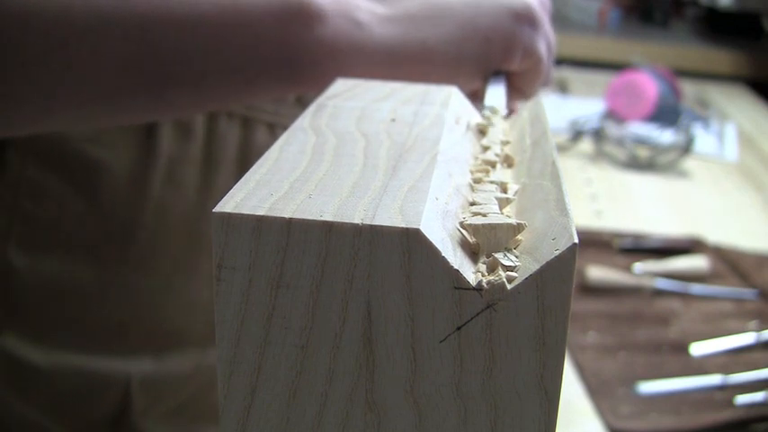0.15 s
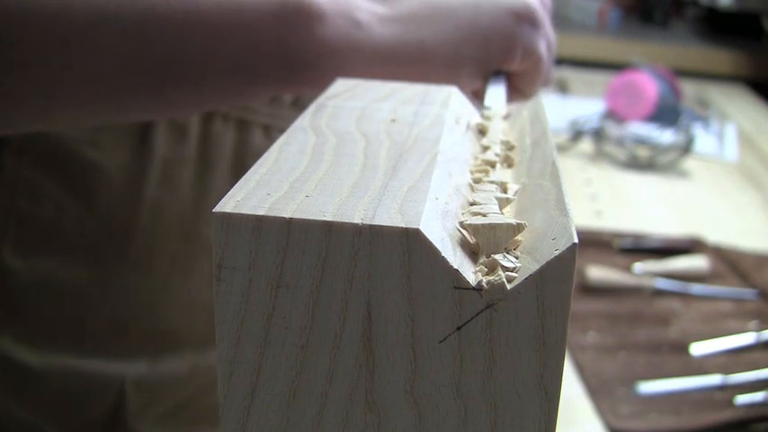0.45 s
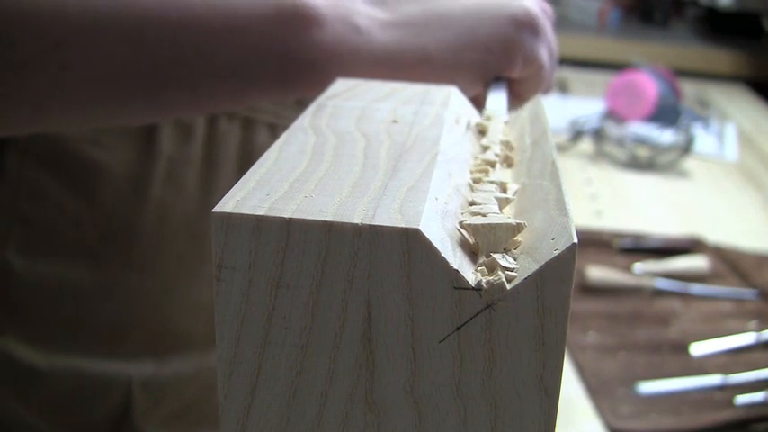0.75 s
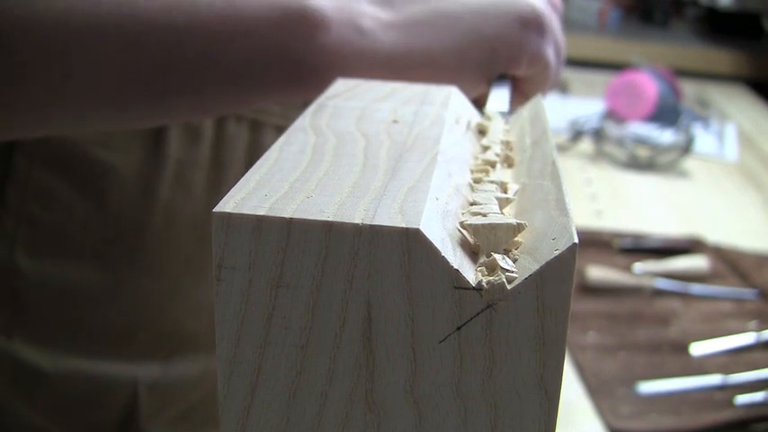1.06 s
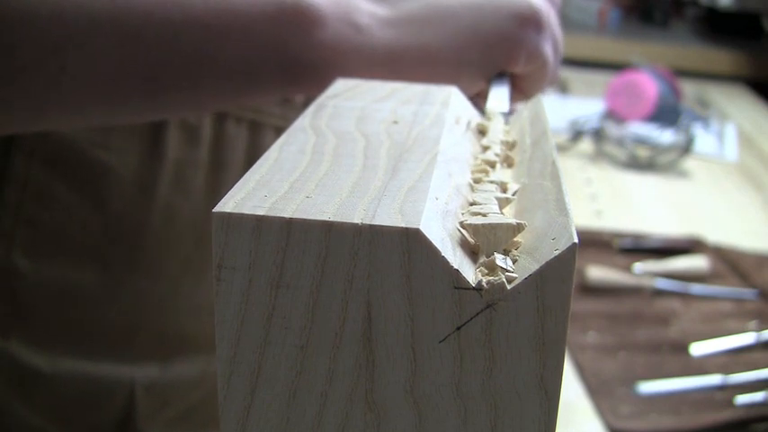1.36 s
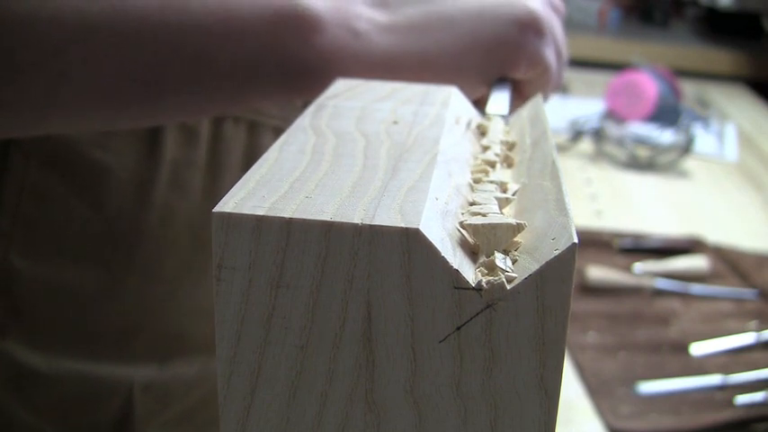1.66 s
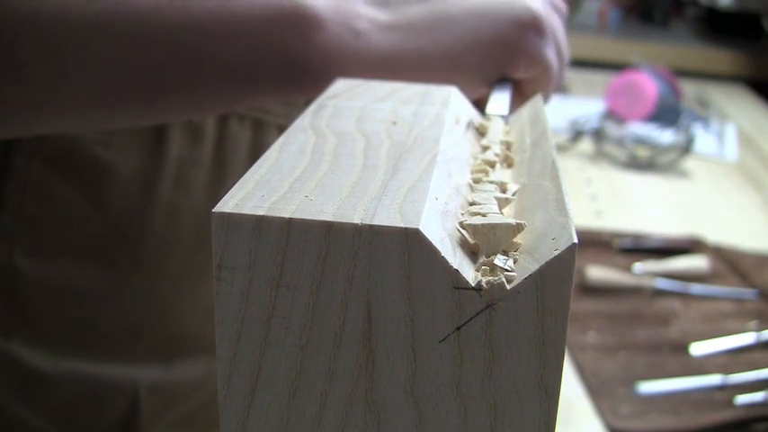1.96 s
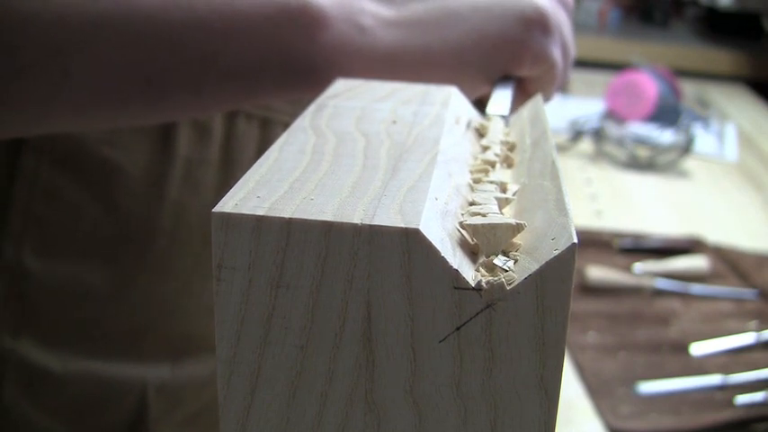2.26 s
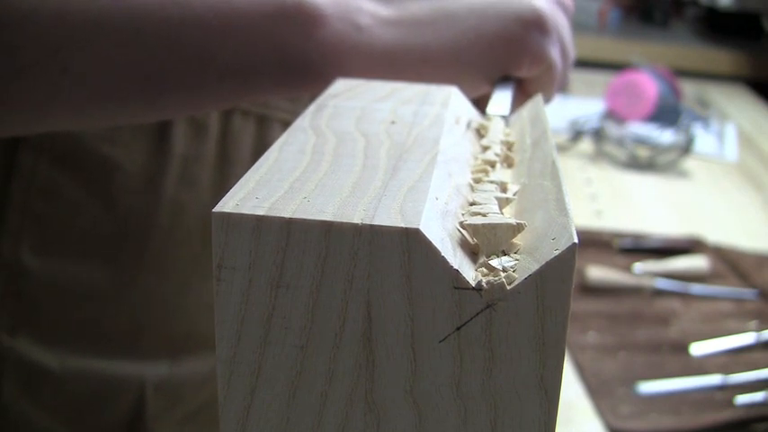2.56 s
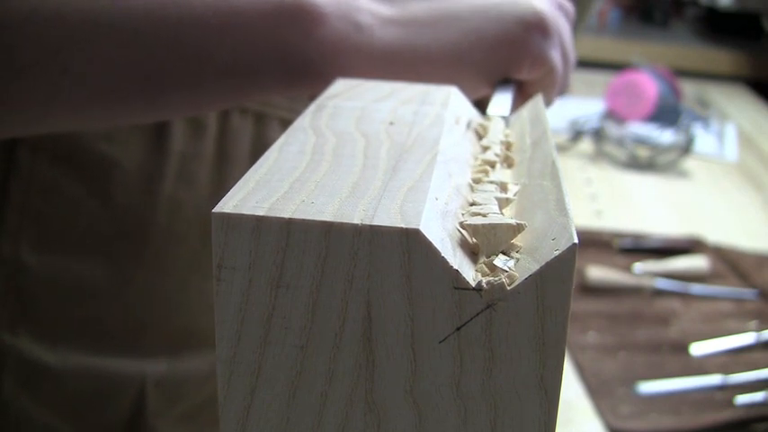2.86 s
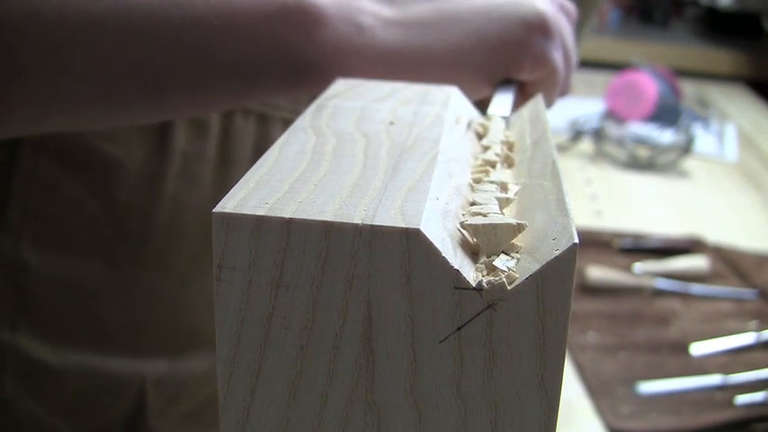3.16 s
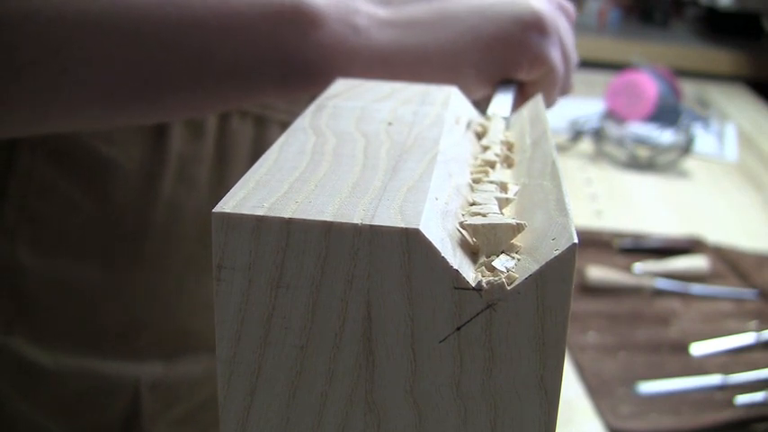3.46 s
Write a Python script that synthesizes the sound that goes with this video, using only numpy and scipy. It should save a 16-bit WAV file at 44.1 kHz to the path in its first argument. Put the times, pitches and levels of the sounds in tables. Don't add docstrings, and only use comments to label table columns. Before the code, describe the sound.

Close, loud chisel blows crack wood fibres and ring block and bench at a steady pace, turning heavier midway; a few tiny chips tick late, in a lively indoor workshop recorded on a small camera.

```python
import sys
import numpy as np
from scipy import signal
from scipy.fft import rfft, irfft
from scipy.io import wavfile
from scipy.ndimage import uniform_filter1d

SR = 44100
rng = np.random.default_rng(int(sys.argv[2]) if len(sys.argv) > 2 else 0)


def volts_from_db(level):
    exponent = np.asarray(level, float) / 20
    return 10 ** exponent


def waveform_to_disk(signal):
    frames = np.transpose(np.atleast_2d(signal))
    scaled = np.clip(frames, -1, 1) * 32767
    samples = np.round(scaled).astype(np.int16)
    wavfile.write(sys.argv[1], SR, samples)


N = 158760

# (frequency [Hz], level [dB per Hz])
HUM_COLOUR = [(30, -29), (66, -34), (85, 3), (125, 2), (250, -5), (1000, -37), (4000, -34), (12000, -46)]
# (frequency [Hz], time to fall 60 dB [s])
ECHO_DECAY = [(100, 0.59), (260, 0.36), (700, .38), (1840, .36), (4850, 0.32), (12800, 0.28)]
# (frequency [Hz], side minus mid [dB])
ECHO_WIDTH = [(60, -2), (150, -18.5), (380, -12), (950, -8), (2380, -3.5), (5980, -18), (15000, -23.5)]
# (frequency [Hz], level [dB per Hz])
TAP_ECHO_COLOUR = [(35, -49), (60, -8.5), (219, -14), (295, -18), (982, -3), (2110, -10.5), (2910, 1),
                   (5950, -14.5), (15000, -37.5)]
# (frequency [Hz], level [dB per Hz])
THUD_ECHO_COLOUR = [(35, -63), (60, -18), (219, -2), (798, -14.5), (1180, -16), (1630, -4.5), (2110, -16.5),
                    (4210, -18.5), (15000, -52.5)]
# (centre [Hz], width [Hz], gain after a tap [dB], gain after a thud [dB])
ECHO_BANDS = [(222, 25, 1, -6.5), (430, 150, 2, -2.5), (540, 77, 8, 14.5), (790, 20, -10.5, 9.5),
              (1002, 30, 14, 4), (1510, 40, 12, 3), (1536, 33, -14, 1.5), (2030, 93, 3.5, -7),
              (2430, 67, -11.5, 1.5), (3070, 67, -11.5, 13.5), (3780, 900, 2.5, -14),
              (3890, 1200, -8.5, 13), (5500, 170, 11.5, 0.5), (7700, 420, -2, 11.5)]
# (time [s], level [dB], length [s], lowest frequency [Hz])
FALLING_CHIPS = [
    (2.56, -39, .04, 6000),
    (2.61, -32, 0.039, 5970),
    (2.653, -53, .03, 5000),
    (2.785, -49, .03, 6000),
    (2.802, -40, 0.025, 6000),
    (2.895, -59, 0.014, 5000),
    (3.385, -36.5, 0.013, 5500),
    (0.575, -55, 0.026, 4500),
]
# (frequency [Hz], level in a tap [dB], level in a thud [dB],
# time to fall 60 dB [s])
BENCH_MODES = [(138, -14, -8, .28), (172, -8, -2, .32), (235, -8, 6, .22), (345, -16, 0, .25),
               (466, -18, 2, .22), (533, -14, 4, .2), (617, -12, -7, .26), (807, -11, -1, .28),
               (1002, -3, -12, .28), (1037, -7, -14, .26), (1312, -11, -15, .24), (1385, -13, -11, .24),
               (1606, -14, -4, .28), (2869, -12, -18, .24)]
# (frequency [Hz], level in a tap [dB], level in a thud [dB],
# time to fall 60 dB [s])
BLOCK_MODES = [(500, -26, 4, 0.016), (882, 2, -7.5, .022), (1307, -2, 1, 0.023), (1982, -0.5, 6.5, .013),
               (2300, -4, -3, 0.017), (2765, 6.5, 1.5, 0.016), (3335, 4, 4, .011), (3790, 3.5, 5, 0.011),
               (4425, 2, 6, 0.013), (5156, 6.5, -1.5, 0.0098), (6346, 0.5, -7, 0.021)]
# (time [s], force [dB], contact time [ms], bite [0 sharp tap - 1 deep thud], treble [dB])
MALLET_BLOWS = [(.111, -2, 0.13, 0.63, -3.5), (.353, -2.5, 0.13, 0.52, 2.5), (.600, -4, 0.079, 0.16, -2.5),
                (.833, -3.5, 0.096, 0.1, -3.5), (1.070, -2.5, 0.11, 0.47, 2), (1.298, -3.5, 0.09, 0.39, -3),
                (1.532, -4.5, 0.076, 0.42, 0), (1.804, -8, 0.18, 0.92, -16),
                (2.026, -1.5, 0.16, 0.74, -8.5), (2.247, 0, 0.16, 0.89, -9.5), (2.469, 0, 0.14, 0.87, -6),
                (2.699, 0, 0.16, 0.81, -3.5), (2.939, -0.5, 0.14, 0.8, -1.5),
                (3.183, -1.5, 0.15, 0.57, 1.5), (3.4202, -3.5, 0.097, 0.42, -3.5), (-.13, -7.5, .2, .5, -8)]

HUM_DB, HUM_SIDE_DB = -42, -19
ROOM_DB, ROOM_START_S, ROOM_RISE_S = -16, 0.0029, 0.00067
FAR_WALL_S, FAR_WALL_SPREAD_S, FAR_WALL_DB = 0.1, 0.022, 2.5
SHARED = 0.57
PATCHY_DB, TREBLE_HZ = 2, 2600
CHIP_GRAINS_PER_S, CHIP_WET_DB = 2500, -5
BENCH_DB, BENCH_RISE_S = -14, 0.005
CRACK_DB, CRACK_T60_S, CRACK_HZ, CRACK_TOP_HZ = -0.5, 0.023, 2190, 7900
DETUNE, UNEVEN_DB, BLOCK_T60_MAX_S = 0.03, 1.5, 0.02
SOFT_START_S, SOFT_START_DIP = 0.0004, 0.7
BLOW_DB, DIRECT_SIDE_DB = 6, -22.5
SHORT = 4096
LIMIT_DB, SQUEEZE = -23, 0.35
SENSE_S, LAG_S, DUCK_S, RECOVER_DB_PER_S = 0.0021, 0.0025, 0.00085, 123.5
KNEE, CEILING = 4, 0.87
LOW_CUT_HZ, COUPLING_HZ, TOP_CUT_HZ = 97, 55, 13800


def evened(x):
    return x / np.sqrt(np.mean(x ** 2) + 1e-20)


def read(points, hz):
    f, value = np.transpose(points)
    return np.interp(np.log(hz + 1), np.log(f + 1), value)


def between(tap, thud, bite):
    return tap + bite * (thud - tap)


def high(x, hz):
    return signal.sosfilt(signal.butter(2, np.clip(hz, 5, SR / 2.2), "high", fs=SR, output="sos"), x)


def low(x, hz):
    return signal.sosfilt(signal.butter(2, np.clip(hz, 5, SR / 2.2), fs=SR, output="sos"), x)


def add(mix, s, sound):
    at = round(s * SR)
    sound = sound[..., max(-at, 0):]
    part = mix[..., max(at, 0):][..., :sound.shape[-1]]
    part += sound[..., :part.shape[-1]]


def room_tone():
    spectrum = rfft(rng.standard_normal((2, N)))
    spectrum = spectrum * volts_from_db(read(HUM_COLOUR, np.fft.rfftfreq(N, 1 / SR)))
    return volts_from_db([[HUM_DB], [HUM_DB + HUM_SIDE_DB]]) * evened(irfft(spectrum, N))


def echo(noise, colour_db):
    hz, t, z = signal.stft(noise, SR, nperseg=1024, noverlap=768)
    wall_db = FAR_WALL_DB * np.exp(-((t - FAR_WALL_S) / FAR_WALL_SPREAD_S) ** 2)
    fall_db = 60 * t / read(ECHO_DECAY, hz)[:, None]
    z = z * volts_from_db(colour_db[:, None] + wall_db - fall_db)
    z[1] *= volts_from_db(read(ECHO_WIDTH, hz))[:, None]
    tail = signal.istft(z, SR, nperseg=1024, noverlap=768)[1][:, :noise.shape[1]]
    t = np.arange(tail.shape[1]) / SR
    tail = tail * np.clip((t - ROOM_START_S) / ROOM_RISE_S, 0, 1)
    return tail / np.linalg.norm(tail[0])


def echo_colour(bite, treble_db):
    hz = np.fft.rfftfreq(1024, 1 / SR)
    colour_db = between(read(TAP_ECHO_COLOUR, hz), read(THUD_ECHO_COLOUR, hz), bite)
    colour_db = colour_db + treble_db / (1 + (TREBLE_HZ / (hz + 1)) ** 2)
    for f, width, tap_db, thud_db in ECHO_BANDS:
        colour_db = colour_db + between(tap_db, thud_db, bite) / (1 + (2 * (hz - f) / width) ** 2)
    patches = uniform_filter1d(rng.standard_normal(len(hz)), size=4)
    return colour_db + PATCHY_DB * evened(patches)


def chip(db, length, low_hz, shared):
    t = np.arange(SHORT) / SR
    hit = rng.random(SHORT) < CHIP_GRAINS_PER_S / SR
    clicks = hit * rng.standard_normal(SHORT)
    bright = low(high(high(clicks, low_hz), low_hz), 9800)
    dry = volts_from_db(db - 25 * t / length) * evened(bright)
    out = volts_from_db(CHIP_WET_DB) * signal.fftconvolve(dry[None], echo(shared, np.zeros(513)), axes=1)
    out[0, :SHORT] += dry
    return out


def ring(modes, bite, t, detune, uneven_db, longest):
    hz, tap_db, thud_db, t60 = np.transpose(modes)[:, :, None]
    chance = rng.standard_normal((2, len(modes), 1))
    db = between(tap_db, thud_db, bite) + uneven_db * chance[1]
    fade = volts_from_db(db - 60 * t / np.minimum(t60, longest))
    return (fade * np.sin(2 * np.pi * hz * (1 + detune * chance[0]) * t)).sum(0)


def bench_ring(bite, t):
    rise = 1 - np.exp(-t / BENCH_RISE_S)
    return volts_from_db(BENCH_DB) * ring(BENCH_MODES, bite, t, 0, 2 * UNEVEN_DB, 1) * rise


def fibre_crack(treble_db, t):
    noise = rng.standard_normal((2, len(t)))
    cracks = low(high(noise, CRACK_HZ), CRACK_TOP_HZ)
    fade = volts_from_db(CRACK_DB + treble_db - 60 * t / CRACK_T60_S)
    return cracks * fade * np.minimum(t / 0.00088, 1)


def block_knock(contact_ms, bite, t):
    u = np.minimum(t[:256] * 1000 / (2 * contact_ms), 1)
    push = np.sin(np.pi * u) ** 2
    push = -push / np.sum(push)
    ringing = ring(BLOCK_MODES, bite, t, DETUNE, UNEVEN_DB, BLOCK_T60_MAX_S)
    knock = np.convolve(ringing, push)[:len(t)]
    return knock * (1 - SOFT_START_DIP * np.exp(-t / SOFT_START_S))


def blow(force_db, contact_ms, bite, treble_db, shared):
    t = np.arange(shared.shape[1]) / SR
    bite = np.clip(bite, 0, 1)
    knock = block_knock(contact_ms, bite, t[:SHORT])
    cracks = fibre_crack(treble_db, t[:SHORT])
    fresh = rng.standard_normal(shared.shape)
    pattern = SHARED * shared + np.sqrt(1 - SHARED ** 2) * fresh
    out = volts_from_db(ROOM_DB) * 60 * echo(pattern, echo_colour(bite, treble_db))
    out[0] += bench_ring(bite, t)
    out[0, :SHORT] += knock + cracks[0]
    out[1, :SHORT] += volts_from_db(DIRECT_SIDE_DB) * (cracks[1] + np.gradient(knock) * 3)
    return volts_from_db(BLOW_DB + force_db) * out


def scene():
    mix = room_tone()
    shared = rng.standard_normal((2, SR * 3 // 5))
    for s, *settings in FALLING_CHIPS:
        add(mix, s, chip(*settings, shared))
    for s, *settings in MALLET_BLOWS:
        add(mix, s, blow(*settings, shared))
    mid, side = mix
    return np.array([mid + side, mid - side])


def gain_control(x):
    t = np.arange(N) / SR
    keep = np.exp(-1 / (SENSE_S * SR))
    power = signal.lfilter([1 - keep], [1, -keep], (x ** 2).mean(0))
    power_db = 10 * np.log10(power + 1e-12)
    sink_db = RECOVER_DB_PER_S * t
    held_db = np.maximum.accumulate(power_db + sink_db) - sink_db
    over_db = np.maximum(held_db - LIMIT_DB, 0)
    slow = np.exp(-1 / (DUCK_S * SR))
    duck_db = signal.lfilter([1 - slow], [1, -slow], np.interp(t - LAG_S, t, over_db))
    return x / volts_from_db(SQUEEZE * duck_db)


def overload(x):
    x = x / CEILING
    return CEILING * x / (1 + abs(x) ** KNEE) ** (1 / KNEE)


def band_limit(x):
    return signal.sosfilt(signal.butter(12, 16810, fs=SR, output="sos"), x)


def record(dry):
    x = gain_control(high(dry, LOW_CUT_HZ))
    mix = low(high(overload(x), COUPLING_HZ), TOP_CUT_HZ)
    return band_limit(mix)


dry = scene()
out = record(dry)
waveform_to_disk(out)
```